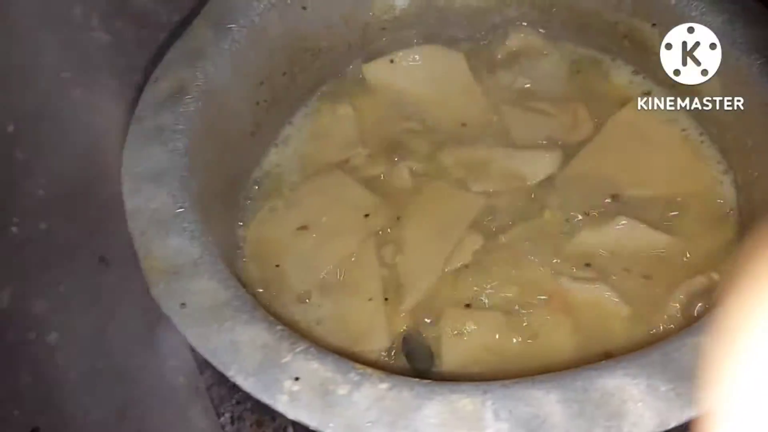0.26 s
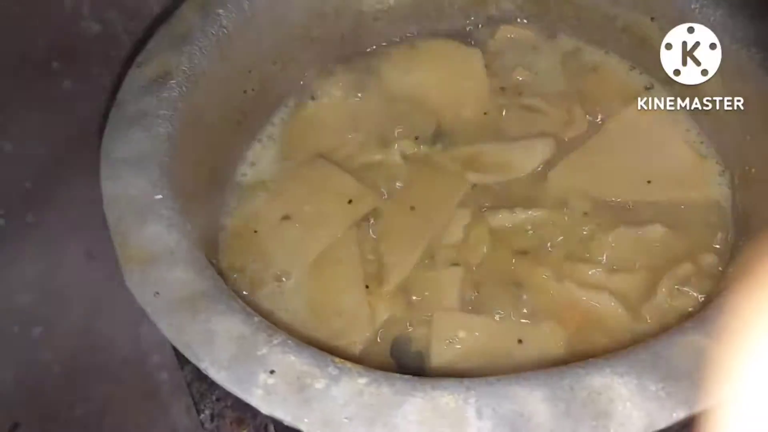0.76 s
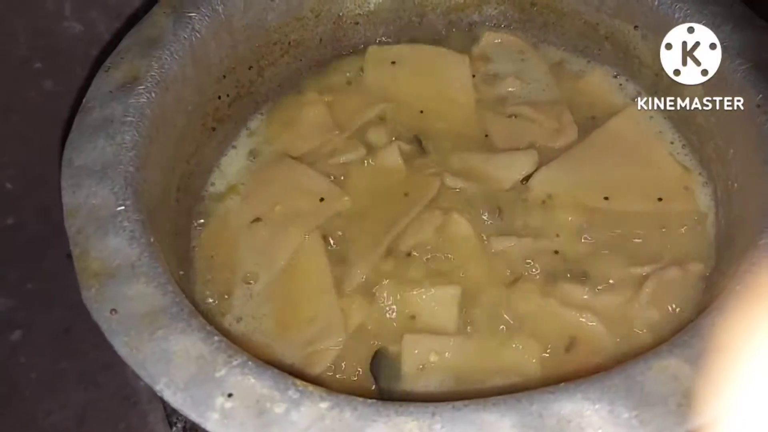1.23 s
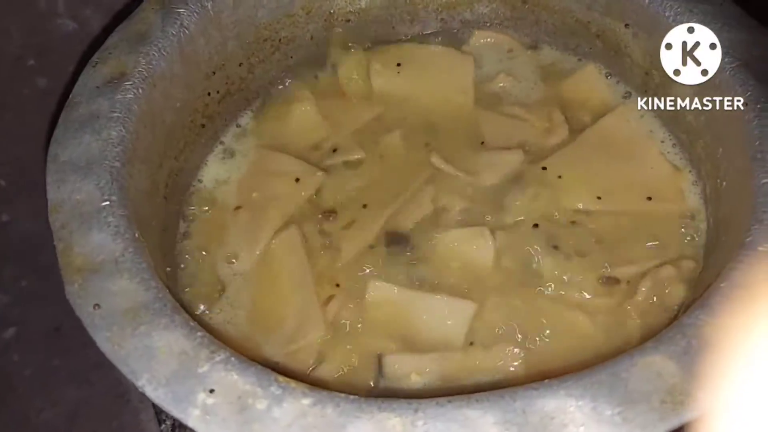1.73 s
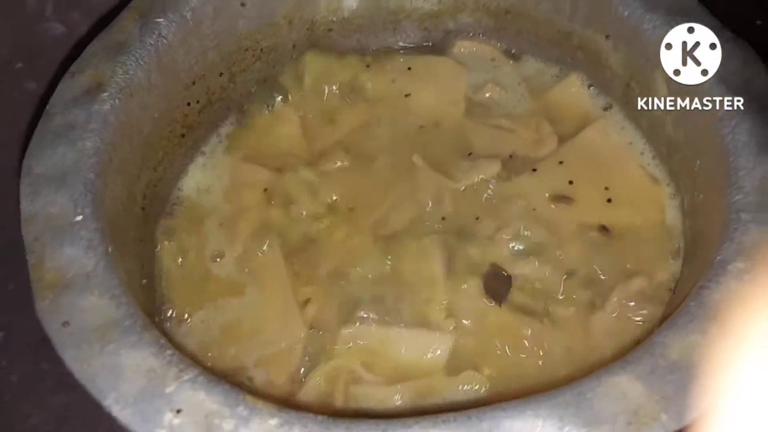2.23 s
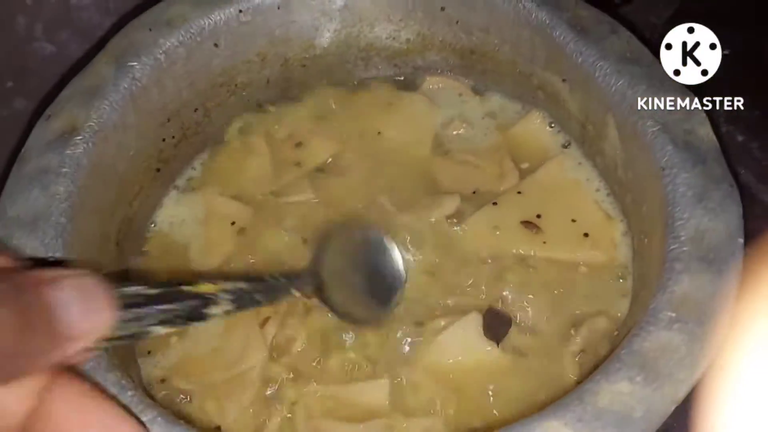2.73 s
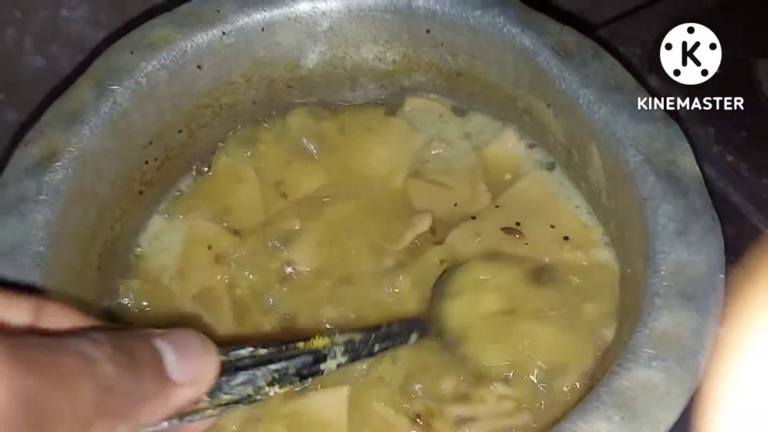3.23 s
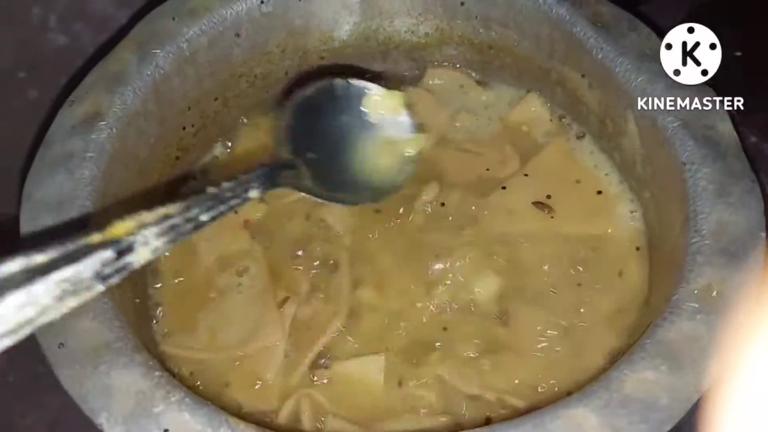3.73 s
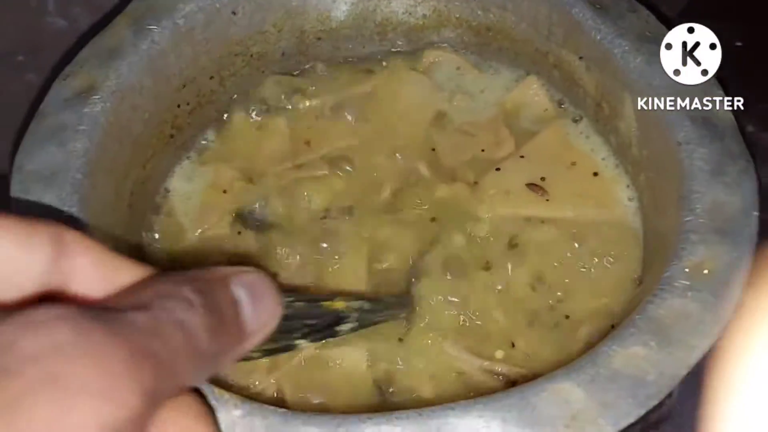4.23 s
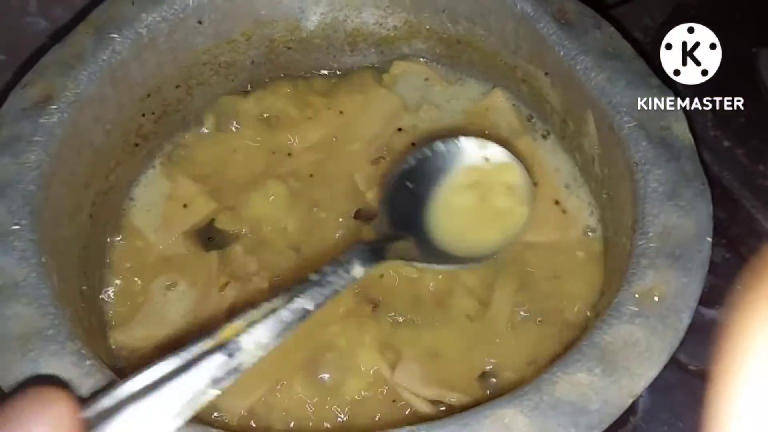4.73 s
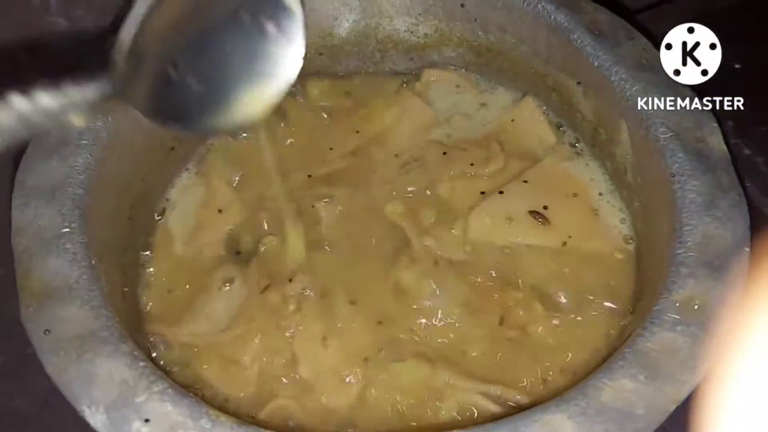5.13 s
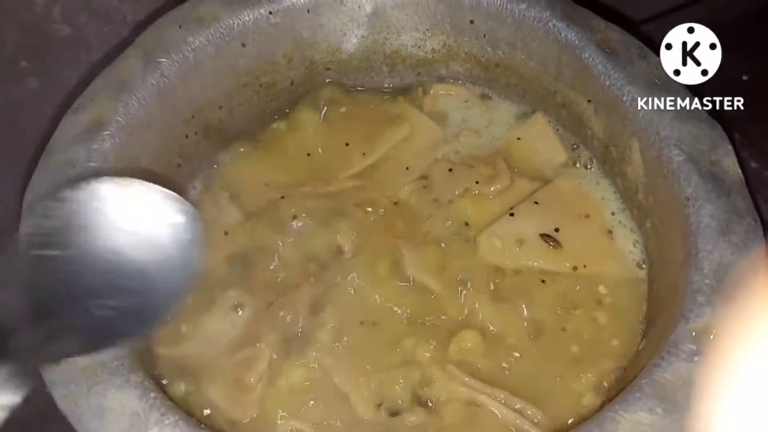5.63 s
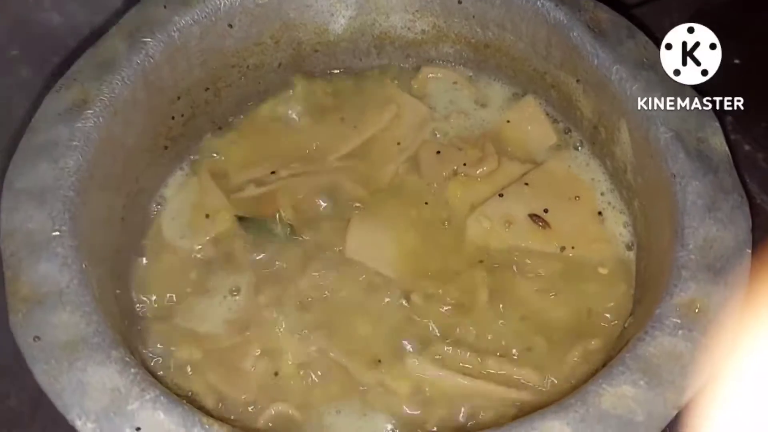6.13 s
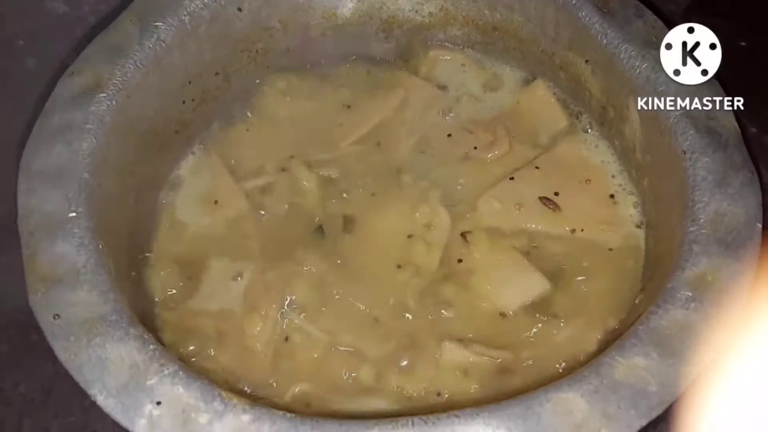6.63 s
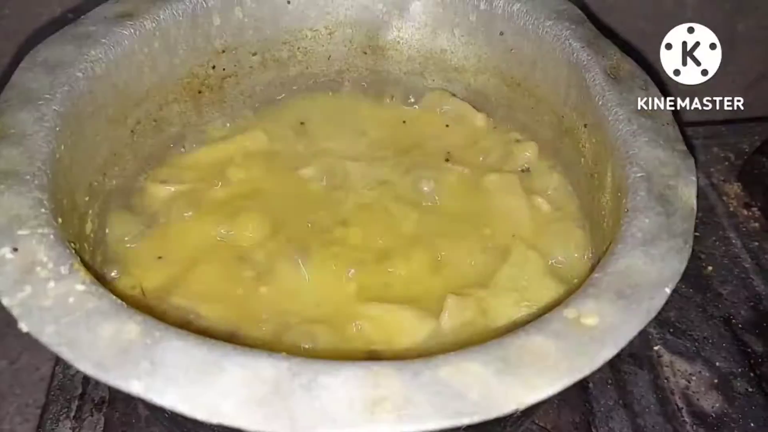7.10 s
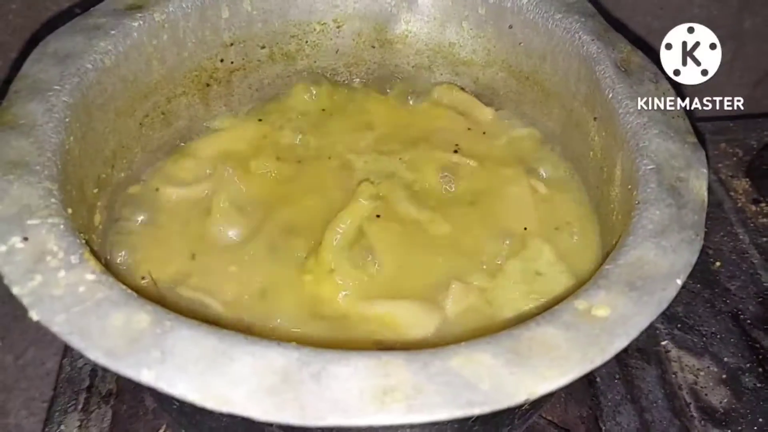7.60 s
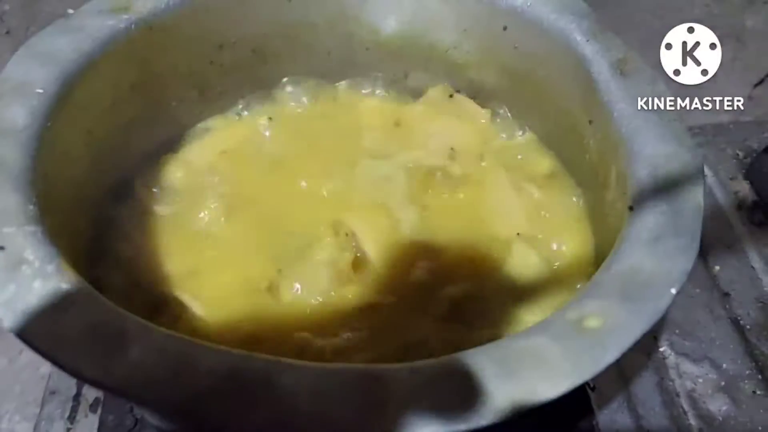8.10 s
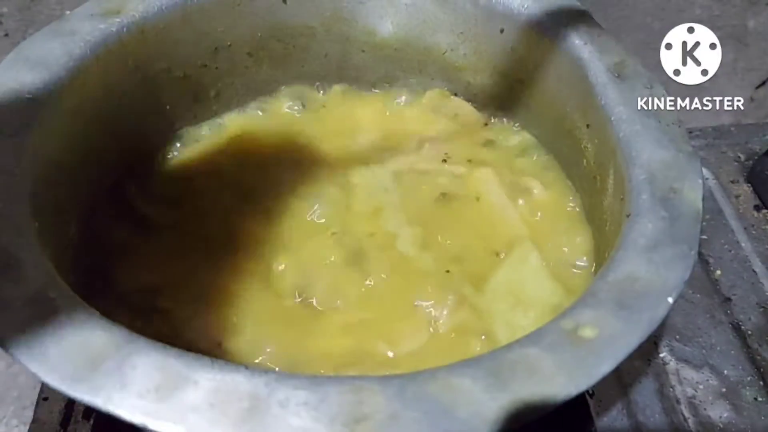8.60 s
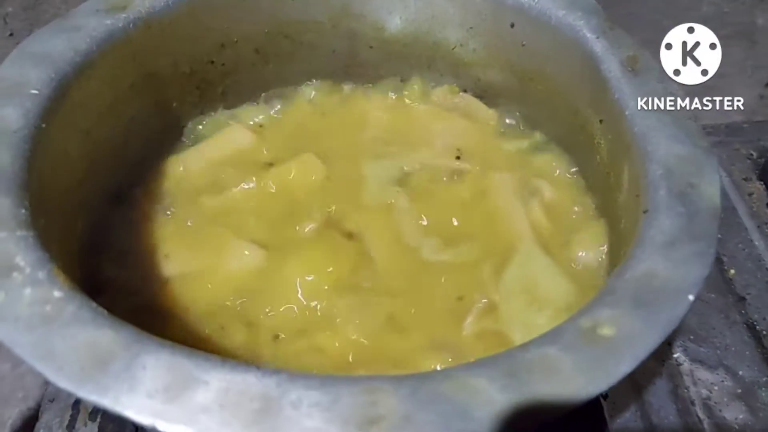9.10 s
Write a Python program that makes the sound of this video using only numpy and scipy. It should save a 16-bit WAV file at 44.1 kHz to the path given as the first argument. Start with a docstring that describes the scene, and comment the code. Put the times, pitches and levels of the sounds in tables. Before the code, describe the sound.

A close stereo microphone in a small kitchen catches thick sauce bubbling in a hollow metal pot. Dull plops with quick rising pitch and crisp popping skins come unevenly over soft seething and a deep steady hum. A single hard metallic clink rings briefly. After a very short gap of silence, smaller bubbles crowd together, the boil sounds fuller, and the low drone grows heavier.

```python
"""Thick curry simmers in a metal pot, close to the microphone: fat bubbles blup as short rising tones,
and their skins snap as filtered bursts of noise with a spatter of ticks and hissing puffs of steam.
Swarms of lesser bubbles, a fine fizz and a soft wash of noise lie under them; the flame drones low.
A spoon clinks once on the rim, a sharp crack and many dying tones, with a faint rattle after it.
After a brief silence the pot is heard boiling harder, with a stronger flame."""
import sys
import numpy as np
from scipy import signal
from scipy.fft import rfft, irfft, next_fast_len
from scipy.io import wavfile

SR = 44100
rng = np.random.default_rng(int(sys.argv[2]) if len(sys.argv) > 2 else 0)


def unload_audio(sound):
    """Save the sound as a 16-bit wav file, at the path given as the first command line argument."""
    columns = np.transpose(np.atleast_2d(sound))
    # keep every value between -1 and 1, then stretch to whole-number steps
    steps = np.round(np.clip(columns, -1, 1) * 32767)
    wavfile.write(sys.argv[1], SR, steps.astype(np.int16))


N = 412335
TIME = np.arange(N) / SR  # seconds
SILENCE_START_S, SILENCE_END_S = 7.148, 7.236
HARDER = (TIME > (SILENCE_START_S + SILENCE_END_S) / 2) * 1.  # 0 at a simmer, 1 at a full boil
TOP_HZ = 15700  # upper limit of the sound

# strength of the boil over time, as relative levels: time_s, lesser_bubbles_db, fizz_db
BOIL_STRENGTH = [(0, -55.5, -59), (.9, -54, -55), (1.1, -58, -58), (2, -55, -57.5), (3.5, -54, -56.5),
                 (6.5, -53.5, -57), (7.25, -56, -59), (7.35, -60.5, -61), (7.41, -49, -51.5),
                 (7.48, -55.5, -54), (7.8, -53.5, -55.5), (9.35, -49.5, -55.5)]


def amp(db):
    """Turns decibels into a gain."""
    return 10 ** (np.asarray(db) / 20)


def evened(x):
    """Scales a sound to an average strength (rms) of 1."""
    return x / np.sqrt(np.mean(x ** 2) + 1e-20)


def follow(rows, column):
    """Gain over time, from a dB column of a table that starts with times."""
    rows = np.array(rows)
    return amp(np.interp(TIME, rows[:, 0], rows[:, column]))


def colour(x, rows, column=1, share=1):
    """Makes some pitches louder than others, by a dB column of a table that starts with pitches."""
    rows = np.array(rows)
    size = next_fast_len(x.shape[-1])
    log_hz = np.log(np.fft.rfftfreq(size, 1 / SR) + 1)
    gain = amp(share * np.interp(log_hz, np.log(rows[:, 0]), rows[:, column]))
    return irfft(rfft(x, size) * gain, size)[..., :x.shape[-1]]


def by_heat(x, rows, share=1):
    """Colours the simmer and the full boil each by its own column."""
    simmer = colour(x, rows, 1, share)
    boil = colour(x, rows, 2, share)
    return (1 - HARDER) * simmer + HARDER * boil


def add(mix, s, sound):
    """Mixes a sound in at a time in seconds."""
    start = max(round(s * SR), 0)
    part = mix[..., start:][..., :sound.shape[-1]]
    part += sound[..., :part.shape[-1]]


def flame():
    """A low drone, nearly the same on both sides; the stronger flame wakes a higher resonance."""
    # strength of the flame: time_s, relative level_db
    strength = [(0, -43), (1.2, -45.5), (3.4, -44.5), (6.9, -45), (7.25, -46), (7.5, -43.5), (8.25, -41),
                (9.35, -41)]
    # tone of the drone: pitch_hz, relative simmer_db, relative boil_db
    drone = [(24.8, -46.5, -35), (47, -11.5, -12), (59.2, -3.5, 1), (67, 3.5, 3.5), (80.4, -1, 0),
             (94, -9.5, -2), (108.7, -4, -1.5), (129, -9, -0.5), (144, -11.5, 4.5), (158, -12.5, 1),
             (171, -15.5, -12.5), (227, -22, -16), (500, -50, -44)]
    boil_db, apart_db, left_db = 2, -16, 1.0  # apart: noise that differs between the sides
    shared = rng.standard_normal(N)
    apart = amp(apart_db) * rng.standard_normal((2, N))
    roar = (shared + apart) * amp([[left_db], [0]])
    gentle = evened(colour(roar, drone, 1))
    strong = evened(colour(roar, drone, 2))
    growth = np.interp(TIME, (7.3, 7.95), (0, 1))
    return follow(strength, 1) * ((1 - growth) * gentle + amp(boil_db) * growth * strong)


def seethe(count):
    """Bubbles too fine to tell apart merge into a soft wash that swells and sinks."""
    # tone of the wash: pitch_hz, relative level_db per Hz
    wash_tone = [(150, -28), (270, -2.5), (390, 2), (650, -3.5), (1000, -20), (1600, -15), (3000, -8.5),
                 (7000, -13), (15000, -28)]
    boil_db, swell_db, swell_s = 1.0, 0.9, 0.046
    wash = evened(colour(rng.standard_normal((count, N)), wash_tone)) / np.sqrt(count)
    swell = np.interp(TIME / swell_s, np.arange(1000), rng.standard_normal(1000))
    level_db = boil_db * HARDER + swell_db * swell / (1 + HARDER)
    return amp(level_db) * follow(BOIL_STRENGTH, 2) * wash


def spoon():
    """Each blow cracks, then rings the modes of pot and spoon over a duller shimmer of lesser ones."""
    # the clink on the rim and its rattle: start_s, relative level_db
    clinks = [(5.585, 3.5), (5.609, -20), (5.642, -16.5)]
    # modes of pot and spoon: pitch_hz, relative level_db, t60_s (time to fade by 60 dB)
    metal = [(350, -10, .04), (624, 2, 0.19), (670, -2, .09), (867, -7, 0.14), (917, -13, .3),
             (1140, -8, .08), (1432, -1, 0.11), (1499, -6, .13), (1571, -3, 0.34), (1680, -5, 0.13),
             (1755, -3, 0.14), (2137, -1, 0.07), (2175, -9, 0.19), (2349, -5, .1), (2630, -8, 0.08),
             (2775, -6, 0.11), (3006, -1.5, 0.17), (3224, -2.5, 0.15), (4533, -21, .22), (6492, -21, .16),
             (7240, -17, .09), (9566, -9, .09), (10725, -16, .11), (14500, -25, .1)]
    # tone of the crack: pitch_hz, relative level_db per Hz
    crack_tone = [(100, -1), (340, 0.5), (480, -5), (660, -1), (950, -2), (1200, -2), (1550, 6.5),
                  (1900, -3), (2300, 2), (2850, 3.5), (3700, -9), (6000, -7.5), (7900, -18.5), (9400, -3.5),
                  (10100, -13), (12500, -11), (15000, -14)]
    ring_db, crack_db, rasp_db, shimmer_db, left_db = -30, -10.5, -1, -26.0, -3
    crack_s, shimmer_s, lag_s = .0021, 0.028, 0.0001  # lag: the right side hears it later
    dull_hz = 5000
    t = np.arange(SR // 2) / SR - crack_s
    age = np.maximum(t - np.array([[0], [lag_s]]), 0)  # time since the blow, on each side
    struck = (age > 0) * 1.
    out = np.zeros((2, N))
    for s, db in clinks:
        ring = 0
        for hz, level_db, t60_s in metal:
            phase = rng.random() + 0.28 * rng.random((2, 1))
            ring = ring + amp(level_db - 60 * age / t60_s) * np.sin(2 * np.pi * (hz * t + phase))
        noise = struck * rng.standard_normal(age.shape)
        click = evened(np.diff(struck, prepend=0))
        blow = click + amp(rasp_db) * evened(noise * np.exp(-age / crack_s))
        crack = evened(colour(blow, crack_tone)) * np.sqrt(crack_s / t[-1] / 2)
        dull = signal.lfilter(*signal.butter(1, dull_hz, fs=SR), evened(colour(noise, crack_tone)))
        shimmer = np.exp(-age / shimmer_s) * dull
        ringing = struck * (amp(ring_db) * ring + amp(shimmer_db) * shimmer)
        add(out, s - crack_s, amp(db) * (amp(crack_db) * crack + ringing))
    return out * amp([[left_db], [0]])


def blup(hz, cycles):
    """A bubble's air swells, rings with rising pitch and dies within a few cycles in the thick sauce."""
    rise_per_cycle = 0.019  # the pitch climbs by this share as the bubble opens
    turns = np.arange(1024) / SR * hz
    swell = turns / cycles * np.exp(1 - turns / cycles)
    return swell * np.sin(2 * np.pi * turns * (1 + rise_per_cycle * turns / 2))


def snap(hz, tear_s=0.001, bright_db=-15):
    """A skin tears: a short rasp and a click ring the opening cavity, and a little escapes bright."""
    click, octaves = 2.93, 0.76  # octaves: reach of the ringing band to either side
    t = np.arange(384) / SR
    tear = rng.standard_normal(len(t)) * np.exp(-t / tear_s) * (1 - np.exp(-t / .00025))
    tear[10] += click
    band = min(hz, SR / 4) * 2. ** np.array([-octaves, octaves])
    band = np.minimum(band, TOP_HZ)
    ring = signal.lfilter(*signal.butter(2, band, "band", fs=SR), tear)
    ring = ring + amp(bright_db) * tear
    return ring / np.linalg.norm(ring) * np.sqrt(.005 * SR)  # rms 1 if spread over 5 ms


def burble(hz):
    """A lesser bubble bursts; its thin skin ticks and a neighbour gives way just after."""
    rim_db, later_s = -13, .014
    sound = np.zeros(4096)
    add(sound, 0, blup(hz, rng.uniform(0.36, 0.57)))
    neighbour = blup(hz * 2 ** rng.uniform(-0.39, 0.77), rng.uniform(0.2, 1.1))
    add(sound, rng.random() * later_s, rng.uniform(-1.02, 1) * neighbour)
    add(sound, rng.random() * later_s, amp(rim_db) * rng.random() * snap(2 * hz))
    return sound


def swarm(grains, per_s, spread_db, cap, count):
    """Scatters grains of random size over count spots of the pot; a full boil makes twice as many."""
    spots = np.zeros((count, N))
    for when, kind, where, size, rank in rng.random((int(2 * per_s * N / SR), 5)):
        if 2 * rank < 1 + HARDER[int(when * N)]:  # a simmer keeps only half
            size_db = spread_db * min(-np.log(1 - size), cap)
            grain = grains[int(kind * len(grains))]
            add(spots[int(where * count)], when * N / SR, amp(size_db) * grain)
    return evened(spots / np.sqrt(1 + HARDER)) / np.sqrt(count)


def small_bubbles(count):
    """Lesser bubbles and the fizz at the wall come in short surges and follow the strength of the boil."""
    bubbles_db, fizz_db = 1, 2
    surge_db, sizzle_db, surge_s = 2.0, 3.8, 0.046  # how far the surges move the bubbles and the fizz
    fine_hz, finest_hz = 1900, 11000
    bubbles = [burble(hz) for hz in np.geomspace(390, 1400, num=80)]
    ticks = []
    for hz in np.geomspace(fine_hz, finest_hz, num=60):
        ticks.append(snap(hz, tear_s=0.00049) * (fine_hz / hz) ** 0.071)  # finer ticks are softer
    bubbling = swarm(bubbles, per_s=90, spread_db=4.5, cap=1.93, count=count)
    fizz = swarm(ticks, per_s=200, spread_db=4.5, cap=3.72, count=count)
    chance = np.clip(rng.standard_normal(1000), -2, 1.5)
    surge = np.interp(TIME / surge_s, np.arange(1000), chance)
    surge = surge / (1 + HARDER)  # the full boil is steadier
    bubbling = amp(bubbles_db + surge_db * surge) * follow(BOIL_STRENGTH, 1) * bubbling
    fizz = amp(fizz_db + sizzle_db * surge) * follow(BOIL_STRENGTH, 2) * fizz
    return bubbling + fizz


def steam(snaps, count):
    """Each burst lets out a puff of steam; the more spray, the more it hisses."""
    puff_db, puff_s, lead_s = -13, 0.005, 0.007  # each puff begins a little before its snap
    t = np.arange(SR // 6) / SR
    flow = np.zeros(N)
    for s, _, _, spray_db in snaps:
        add(flow, s - lead_s, amp(spray_db) * t / puff_s * np.exp(1 - t / puff_s))
    hiss_filter = signal.butter(1, (5500, 9000), "band", fs=SR)
    hiss = signal.lfilter(*hiss_filter, rng.laplace(size=(count, N)))
    return amp(puff_db) * flow * evened(hiss) / np.sqrt(count)


def middling_bubbles():
    """Middling bubbles rise at a loose, steady pace; each skin tears just after its blup."""
    per_s = 8
    skin_holds_s = 0.027  # the skin tears within this time after the blup
    blup_hz, snap_hz, spread_octaves = 825, 3520, 0.53
    blup_db, snap_db, spray_db, spread_db = -41, -44, -52.5, 1  # relative levels
    blups, snaps = [], []
    for k, (when, hold, *draws) in enumerate(rng.random((int(per_s * N / SR), 6))):
        s = (k + when) / per_s
        chance = 2 * np.array(draws) - 1  # from -1 to 1
        fat_db, loud_db = spread_db * chance[:2]
        low, high = 2 ** (spread_octaves * chance[2:])
        blups.append((s, blup_db + fat_db, blup_hz * low, rng.uniform(0.35, 0.73)))
        tear_at = s + skin_holds_s * hold
        snaps.append((tear_at, snap_db + loud_db, snap_hz * high, spray_db + loud_db))
    return blups, snaps


def fat_bubbles(blups, snaps, count):
    """Loud bubbles blup, abrupt ones rasp more; torn skins ring their cavities and spatter small ticks."""
    rasp_db, rasp_hz = -20.0, 2150
    snap_db, bright_db = -5, 6
    cavity_db, cavity_cycles = -2.0, 1.7  # swell of the small cavity that a torn skin opens
    spit_db, spit_s, lead_s = -22, .012, .003  # ticks start just before the snap and thin out after it
    spots = np.zeros((count, N))
    for s, db, hz, cycles in blups:
        spot = spots[rng.integers(count)]
        add(spot, s, amp(db) * blup(hz, cycles))
        rasp = snap(rasp_hz, tear_s=0.0012, bright_db=-17.0)
        add(spot, s, amp(db + rasp_db) / cycles * rasp)
    for s, db, hz, spray_db in snaps:
        spot = spots[rng.integers(count)]
        add(spot, s, amp(db + snap_db) * snap(hz, bright_db=bright_db + spray_db - db))
        add(spot, s, amp(db + cavity_db) * blup(hz, cavity_cycles))
        for late, pitch, size in rng.random(size=(6, 3)):
            tick = snap(hz * 2 ** (2.6 * pitch - 1.2), tear_s=0.00028)
            tick_at = s - lead_s - spit_s * np.log(1 - late)
            add(spot, tick_at, 2 * size ** 2 * amp(db + spit_db) * tick)
    return spots


def pot(spots):
    """Spots reach the left side first; the near wall echoes and blurs, the kitchen adds a faint tail."""
    # colour of the hollow above the food: pitch_hz, simmer_db, boil_db
    hollow = [(297, 4.5, 3), (700, 5, 10), (755, 3, 3), (1005, 10, 8), (1214, 0, 1), (1433, 6.5, 10.5),
              (1750, 5.5, 2), (1940, 3.5, 0), (2025, 5, 3.5), (2800, -0.5, 0), (3220, -4.5, -3.5),
              (4420, -3.5, -2), (6620, -11, -6), (7000, -9, -6.5), (7950, -10.5, -7), (10160, -10.5, -6),
              (13100, -13, -7)]
    near_s, far_s = 0.00017, 0.0003  # how much later the right side hears the first and last spot
    bounce_db, bounce_s = -8, 0.001199  # the clear echo; its delay varies by up to 30 %
    wall_db, wall_s, wall_hz = -7, 0.0049, 1200  # the wall returns mostly short waves, above wall_hz
    room_db, room_t60_s = -15, 0.18
    t = np.arange(SR // 4) / SR
    out = np.zeros((2, N))
    for spot, lag_s in zip(spots, np.linspace(near_s, far_s, len(spots))):
        wall, room = rng.standard_normal((2, 2, len(t)))
        wall = evened(wall * np.exp(-t / wall_s) * (t > .0006))
        wall = amp(wall_db) * wall / np.sqrt(len(t))
        for side in wall:
            side[round(bounce_s * rng.uniform(.7, 1.3) * SR)] += amp(bounce_db)
        room = evened(room * amp(-60 * t / room_t60_s) * (t > .005))
        path = signal.lfilter(*signal.butter(2, wall_hz, "high", fs=SR), wall)
        path = path + amp(room_db) * room / np.sqrt(len(t))
        path[0, 0] += 1  # the direct sound, left and then right
        path[1, round(lag_s * SR)] += 1
        out += signal.oaconvolve(spot[None], path, axes=1)[:, :N]
    return by_heat(out, hollow)


def scene(count=6):
    """Bubbles at count spots of the pot and the spoon, toned differently on each side; the flame below."""
    # the fattest bubbles: start_s, relative level_db, pitch_hz,
    # swell_cycles (cycles to full swell: few = a dull thud, many = a round plop)
    fattest = [(0.2526, -36.5, 530.0, 0.7), (0.2726, -33.0, 760.0, 0.44), (0.3786, -27, 570.0, 0.41),
               (0.5341, -31, 550.0, 0.5), (0.5438, -30, 580.0, 0.41), (0.6324, -29.5, 1460.0, 0.6),
               (0.7053, -36, 660.0, 0.5), (0.7168, -33.0, 550.0, 0.38), (0.7647, -31, 700.0, 1.7),
               (0.7677, -33.5, 530.0, 1.2), (1.2522, -28, 660.0, 0.44), (1.7031, -32, 1340.0, 0.7),
               (1.8463, -35, 1220.0, 0.35), (1.8845, -30.0, 1250.0, 0.54), (1.888, -27, 1380.0, 0.46),
               (1.957, -36, 1000.0, 0.61), (2.0173, -31.5, 940.0, 0.43), (2.1223, -39, 550.0, 2.2),
               (2.2122, -29.5, 620.0, 0.33), (2.2229, -32, 700.0, 0.39), (2.2365, -31.5, 640.0, 0.5),
               (2.3592, -34, 960.0, 0.54), (2.4071, -32, 740.0, 0.33), (2.6413, -35.0, 550.0, 0.41),
               (2.646, -32, 780.0, 0.5), (2.8353, -32.5, 760.0, 0.39), (2.8794, -38, 550.0, 0.89),
               (2.9872, -30, 990.0, 0.52), (2.9976, -29, 860.0, 0.29), (3.0435, -30, 960.0, 0.44),
               (3.1796, -38.5, 660.0, 0.93), (3.2307, -36.0, 1150.0, 2.3), (3.2703, -34, 1220.0, 0.58),
               (3.5527, -34, 860.0, 0.81), (3.6002, -31.5, 580.0, 0.88), (3.7135, -30.5, 1150.0, 0.53),
               (3.778, -30, 600.0, 0.32), (3.785, -29, 880.0, 0.7), (3.9808, -27.0, 860.0, 0.38),
               (3.9922, -31, 1550.0, 2.0), (4.0084, -37.5, 530.0, 1.4), (4.1902, -30.5, 830.0, 0.53),
               (4.3022, -35, 1550.0, 1.3), (4.3471, -30.5, 700.0, 0.43), (4.5769, -30, 880.0, 0.75),
               (4.6234, -37, 620.0, 0.8), (4.6488, -30, 880.0, 0.38), (4.6536, -32, 760.0, 0.3),
               (4.7066, -34.5, 620.0, 0.29), (4.8747, -31, 570.0, 0.39), (4.9499, -32, 620.0, 0.47),
               (5.0367, -31, 780.0, 0.56), (5.0595, -29.5, 1600.0, 1.1), (5.0626, -29, 580.0, 0.39),
               (5.0974, -34.5, 860.0, 0.59), (5.2145, -35, 760.0, 0.7), (5.3192, -36, 1650.0, 1.5),
               (5.4489, -33, 1510.0, 1.2), (5.4556, -32, 570.0, 0.89), (5.6593, -36, 600.0, 0.76),
               (5.6664, -32, 600.0, 0.47), (5.9552, -34, 700.0, 0.56), (6.0105, -31, 680.0, 0.4),
               (6.1293, -27, 640.0, 0.57), (6.1389, -29, 660.0, 0.33), (6.1957, -33, 600.0, 1.1),
               (6.2037, -25, 640.0, 0.34), (6.3618, -37, 570.0, 0.86), (6.4193, -30, 640.0, 0.27),
               (6.5683, -32.5, 760.0, 0.82), (6.7179, -34, 860.0, 0.47), (6.7893, -33.5, 580.0, 0.5),
               (6.8523, -29.5, 600.0, 0.61), (7.4017, -33, 760.0, 0.38), (7.5678, -25.5, 910.0, 0.75),
               (7.6445, -39.0, 1460, 2.0), (7.686, -39.5, 1460, 1.5), (7.7033, -37, 660.0, 0.64),
               (8.108, -33.0, 1440, 1.2), (8.1349, -31.5, 500.0, 0.42), (8.355, -35.5, 640.0, 0.65),
               (8.472, -33.5, 1450.0, 1.3), (8.557, -35, 850.0, 0.76), (8.7244, -30.5, 550.0, 0.94),
               (8.741, -38, 1470, 1.1), (8.84, -30.5, 910, 0.5), (8.942, -33.5, 1490, 1.6),
               (9.06, -33.5, 1030.0, 0.76), (9.1195, -30.0, 620.0, 0.48), (9.159, -34.5, 690.0, 0.58)]
    # the loudest bursting skins: start_s, relative level_db, centre_hz, relative spray_db
    loudest = [(0.0243, -39, 2500, -42), (0.0395, -31.5, 4270, -55), (0.2728, -28.5, 4600, -28),
               (0.3694, -32.5, 2500, -67), (0.633, -31.5, 2090, -65), (0.6332, -40, 4500, -65),
               (0.766, -30.5, 5800, -37), (0.9305, -37, 4600, -43), (0.943, -35, 4600, -32),
               (1.0944, -39.5, 2600, -50), (1.112, -38, 5500, -43), (1.3979, -30.5, 2950, -42),
               (1.4253, -32, 2960, -37), (1.4295, -32, 6000, -37), (1.4656, -33.5, 2610, -31),
               (1.5559, -36, 3800, -49), (1.5717, -30.5, 3730, -43), (1.6646, -40, 4700, -46),
               (1.6876, -37, 2300, -32), (1.8457, -23, 4270, -27), (1.887, -22.5, 2100, -47),
               (1.897, -32, 2600, -32), (1.997, -35, 2300, -62), (2.018, -32, 2240, -56),
               (2.086, -38, 2250, -64), (2.2235, -26.5, 5200, -51), (2.236, -34, 5400, -52),
               (2.6083, -25.5, 4100, -50), (2.612, -34.5, 3900, -67), (2.835, -33.5, 2100, -48),
               (2.8688, -34.5, 5070, -42), (2.9347, -34, 2770, -48), (2.9395, -34, 6900, -50),
               (3.0297, -31, 4260, -46), (3.0374, -29, 3710, -57), (3.27, -44, 2200, -38),
               (3.4384, -32.5, 5500, -38), (3.721, -31, 4670, -42), (3.7384, -38, 2200, -56),
               (3.7952, -26.5, 3500, -37), (3.981, -32, 2620, -57), (3.9948, -22, 4400, -27),
               (4.0632, -31.5, 2270, -62), (4.1769, -35.5, 2500, -33), (4.3235, -27, 4140, -29),
               (4.6545, -30.5, 4200, -50), (4.948, -28.5, 2700, -46), (5.0592, -31, 2180, -44),
               (5.3193, -36, 2010, -51), (5.459, -23.5, 2950, -45.5), (5.9359, -33.5, 3780, -29),
               (5.9762, -30, 3070, -55.5), (5.9913, -33.5, 2200, -47), (6.0132, -30.5, 2700, -45),
               (6.1393, -26.5, 2280, -54), (6.1476, -31, 5440, -47), (6.2044, -23.5, 2670, -54.5),
               (6.2123, -35, 4600, -48), (6.2497, -32.5, 3900, -47), (6.2616, -36.5, 4700, -36),
               (6.364, -34, 5000, -42), (6.379, -34, 4500, -43), (6.4186, -25.5, 3470, -44),
               (6.7376, -33, 2740, -55), (6.7984, -37, 2010, -55), (6.878, -25, 3870, -45),
               (7.0382, -31, 2400, -55), (7.4117, -34.5, 2800, -58), (7.4959, -37.5, 2630, -54),
               (7.6725, -39, 2570, -42), (7.9313, -30.5, 4270, -55), (8.2656, -32.5, 4510, -45),
               (8.4587, -36.5, 2100, -38), (8.6403, -41, 2130, -37), (8.8408, -27.5, 3900, -43),
               (8.985, -36.5, 2400, -52), (9.0049, -34, 2910, -44), (9.0306, -31, 3700, -52),
               (9.147, -37, 2500, -48), (9.1641, -38, 4700, -40), (9.2025, -30.5, 5000, -43)]
    # left minus right: pitch_hz, simmer_db, boil_db
    shade = [(200, 1, 4), (816, 4, 1), (1070, 1.5, 2.5), (1630, 5.5, 1.5), (2620, -1.5, 4.5),
             (5100, -3, -8), (7100, 6.5, 2), (15000, 12, 4)]
    blups, snaps = middling_bubbles()
    blups, snaps = [*fattest, *blups], [*loudest, *snaps]
    bubbling = seethe(count) + small_bubbles(count) + steam(snaps, count)
    bubbling = bubbling + fat_bubbles(blups, snaps, count)
    left, right = pot(bubbling) + spoon()
    shaded = np.array([by_heat(left, shade, 1 / 2), by_heat(right, shade, -1 / 2)])
    return shaded + flame()


def record(dry):
    """The microphone rounds high peaks; the sound fades out and in around the silence; treble is limited."""
    fade_out_s, fade_in_s = 0.06, 0.071
    rounded = .8 * np.tanh(dry / .8)
    fade_out = np.clip((SILENCE_START_S - TIME) / fade_out_s, 0, 1)
    fade_in = np.sqrt(np.clip((TIME - SILENCE_END_S) / fade_in_s, 0, 1))
    limit = signal.firwin(255, TOP_HZ, window=("kaiser", 9), fs=SR)
    return signal.oaconvolve(rounded * (fade_out + fade_in), limit[None], "same")


dry = scene()
out = record(dry)
unload_audio(out)
```